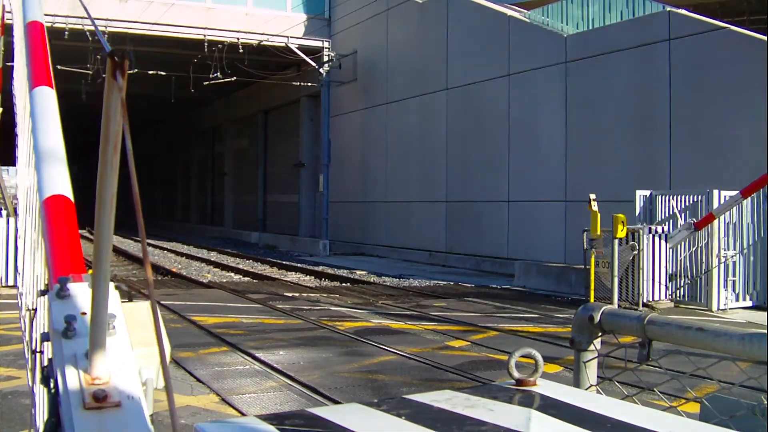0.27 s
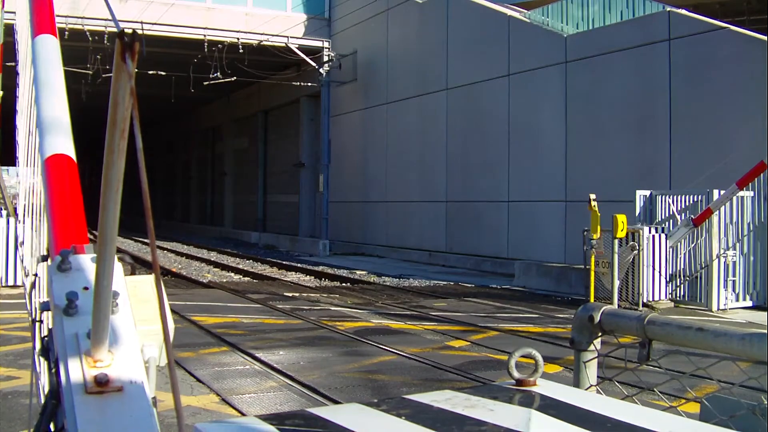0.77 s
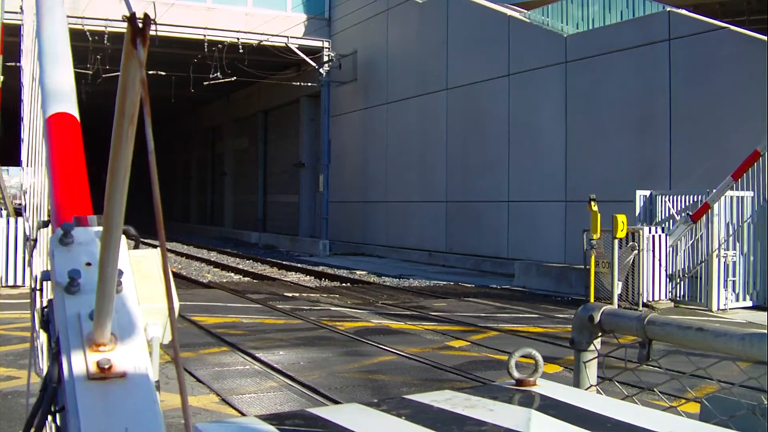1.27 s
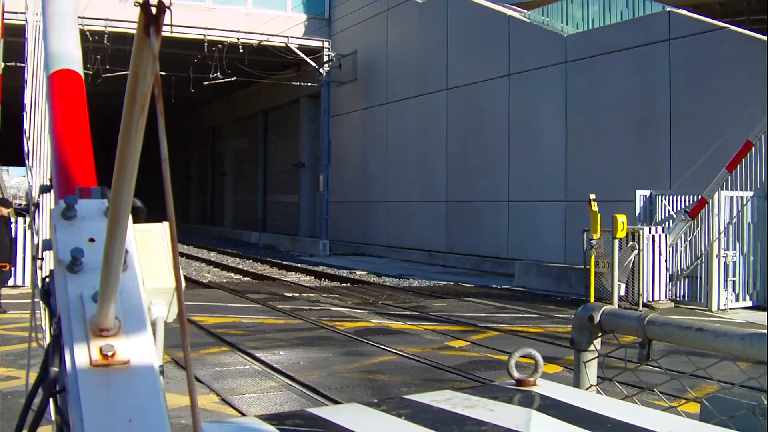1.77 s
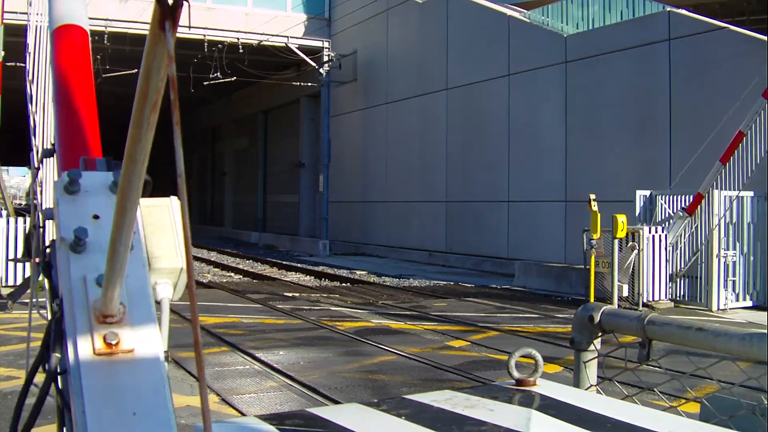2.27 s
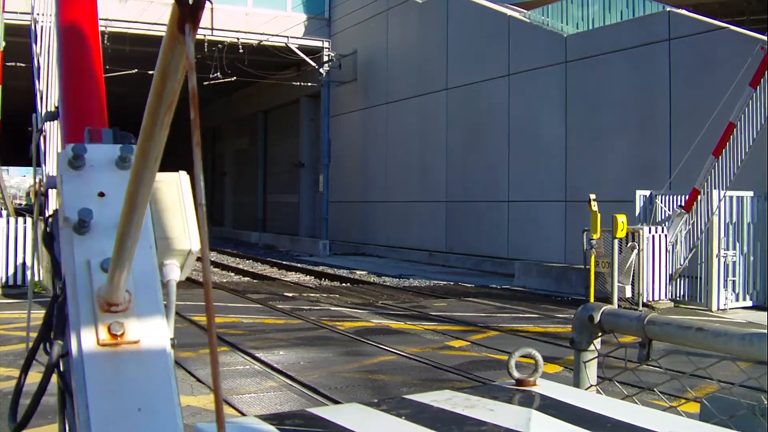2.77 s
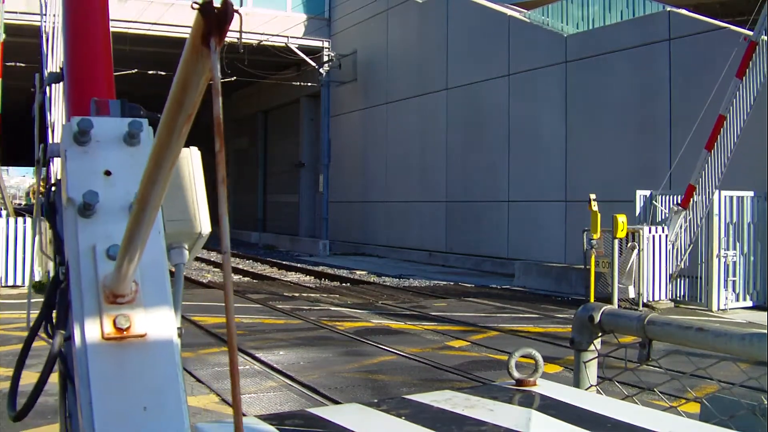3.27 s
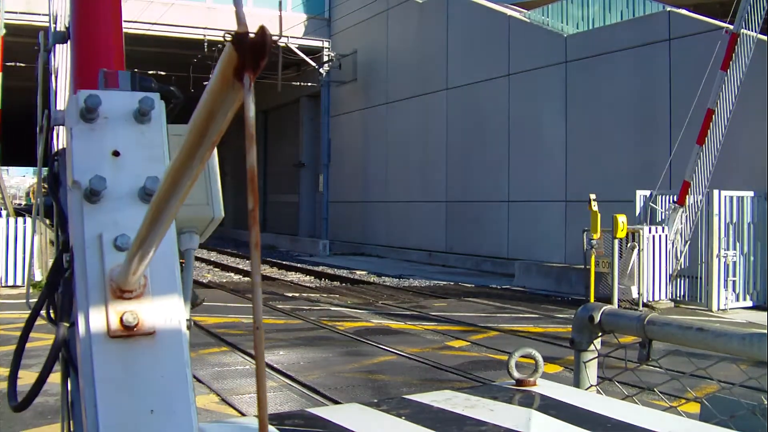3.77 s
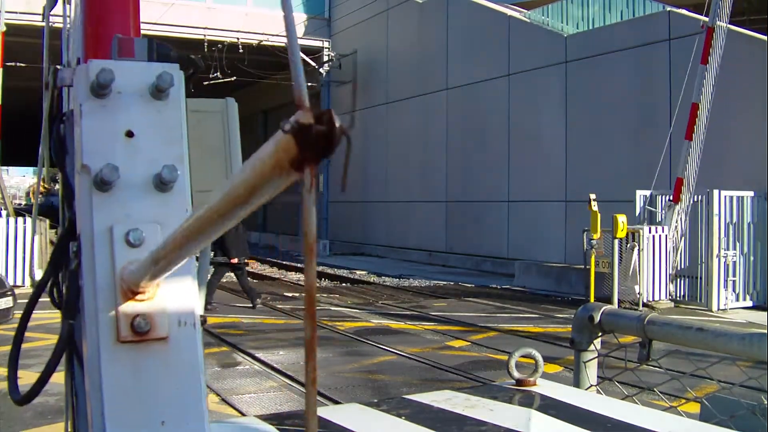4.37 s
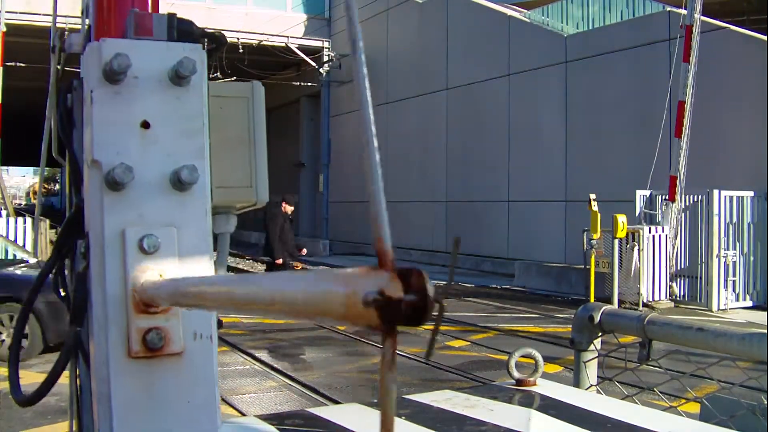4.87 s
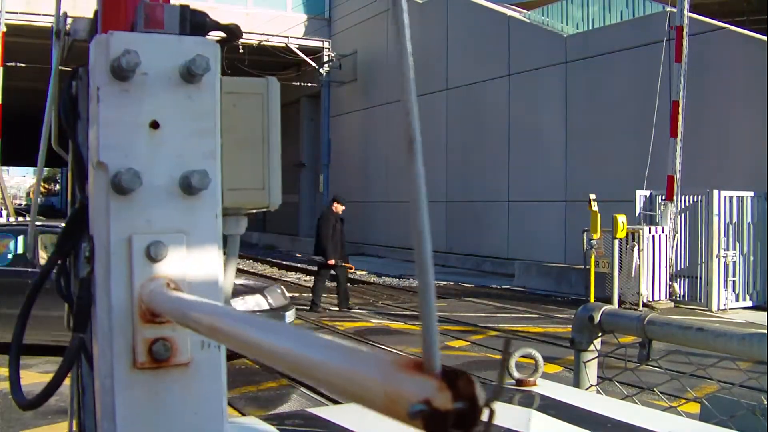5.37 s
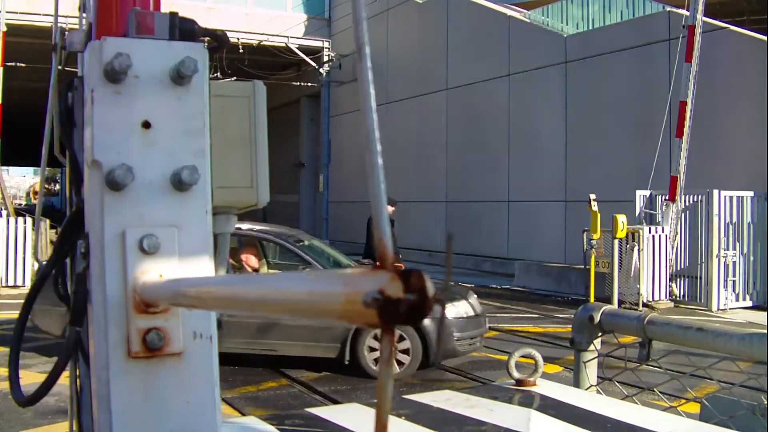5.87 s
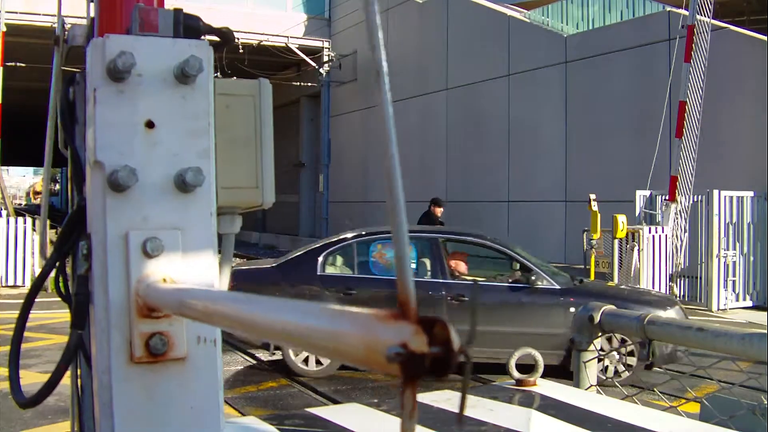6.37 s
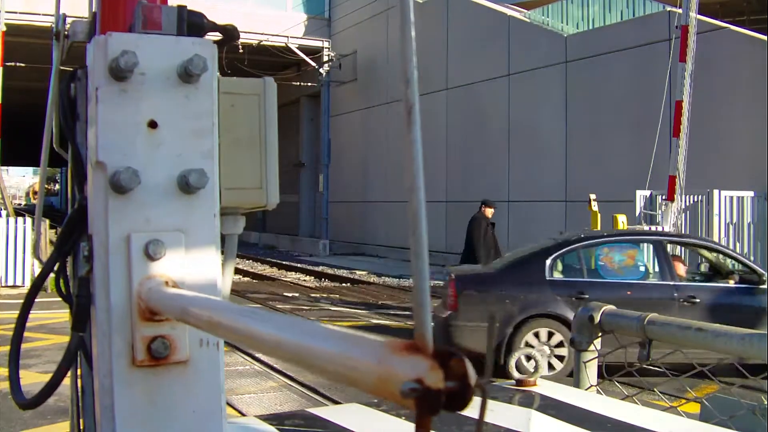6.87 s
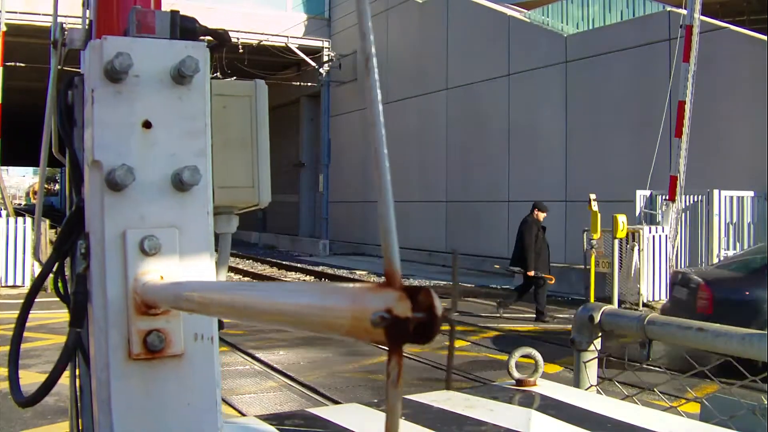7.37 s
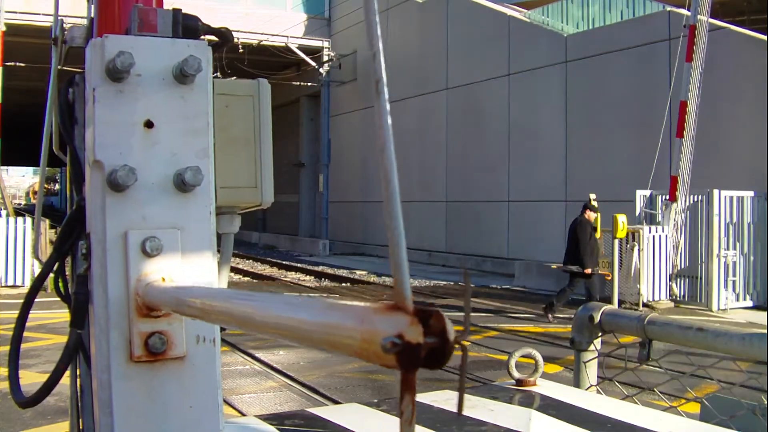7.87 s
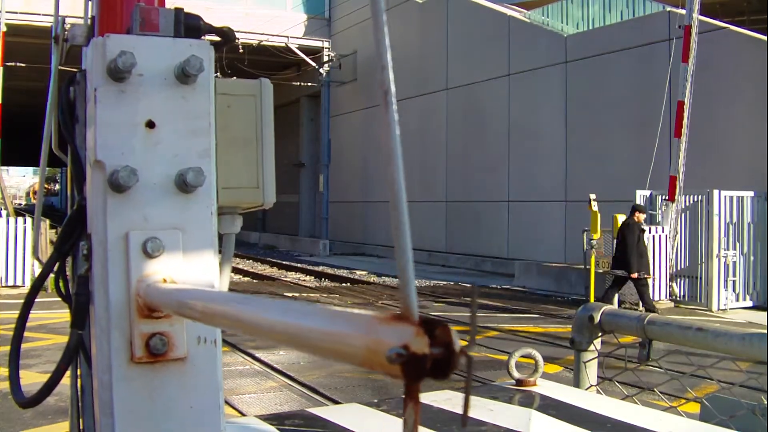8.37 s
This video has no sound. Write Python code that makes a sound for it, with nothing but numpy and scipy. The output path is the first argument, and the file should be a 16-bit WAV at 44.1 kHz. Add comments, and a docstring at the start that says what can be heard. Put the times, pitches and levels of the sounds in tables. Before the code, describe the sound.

A close electric motor hums and buzzes as a barrier lifts, metal linkage chatters briefly, it cuts out, then loud grit crunches and stones crack.

```python
"""A barrier motor hums and buzzes beside the listener, a train whine fades into a tunnel, then grit crunches.
Motor: shaft-locked sines, plus a brush track repeated each turn through housing resonances; cut near 5 s.
Linkage: impact bursts through metal modes, with decaying tones. Grit: random impacts, pebble ticks, scrapes
and cracks filtered by stone and ground. The train is one sinking sine; the car sums engine orders and a tyre
drone as it crosses the rails; knocked parts ring, soft bumps are shaped noise and the town is noise bands."""
import sys
import numpy as np
from scipy import signal
from scipy.fft import rfft, irfft
from scipy.io import wavfile
from scipy.ndimage import uniform_filter1d, map_coordinates

SR = 44100
rng = np.random.default_rng(int(sys.argv[2]) if len(sys.argv) > 2 else 0)


def transcribe(u):
    """Save the signal u as a 16-bit wav file named by the first command-line argument.

    u: samples, shape (n,) or (channels, n), limited to [-1, 1]; the rate is SR.
    q: integer samples, one column per channel.
    """
    v = np.clip(np.atleast_2d(u).T, -1, 1)
    q = np.round(v * 32767).astype(np.int16)
    wavfile.write(sys.argv[1], SR, q)


N = 380130
T = np.arange(N) / SR

# knocks of the metal linkage: (time [s], relative level [dB], mount relative to it [dB])
JINGLES = [(3.413, -19.5, -9), (3.429, -26.5, -2.5), (3.453, -31.5, 1), (3.492, -20.5, -14.5),
           (3.5072, -31, -7), (3.559, -29.5, -5.5), (3.63, -29.5, -7.5), (3.6594, -47, 3)]


def undb(db):
    """Decibels to gain."""
    return 10 ** (np.asarray(db) / 20)


def unit(x):
    """Scale to rms 1."""
    return x / np.sqrt(np.mean(x ** 2) + 1e-18)


def steady(x):
    """Hold the rms at 1 over a moving quarter second."""
    return x / np.sqrt(uniform_filter1d(x ** 2, size=SR // 4) + 1e-18)


def curves(table):
    """Columns of a (time [s], ...) table, joined by straight lines."""
    time_s, *columns = np.transpose(table)
    return [np.interp(T, time_s, column) for column in columns]


def add(out, start_s, x):
    """Mix x into out from start_s."""
    i = max(int(start_s * SR), 0)
    out[i:i + len(x)] += x[:max(N - i, 0)]


def band(x, hz, width_hz):
    """One resonance, gain 1 at its centre."""
    hz = min(hz, .45 * SR)
    return signal.lfilter(*signal.iirpeak(hz, hz / width_hz, fs=SR), x)


def ring(x, modes):
    """Parallel resonances, each cascaded twice for steep skirts."""
    out = 0
    for hz, width_hz, db in modes:
        stage_hz = 1.39 * width_hz  # the cascade narrows the band
        out = out + undb(db) * band(band(x, hz, stage_hz), hz, stage_hz)
    return out


def colour(x, points, size=2048):
    """Minimum-phase filter through (frequency [Hz], level [dB]) points."""
    hz, db = np.transpose(points)
    f = np.maximum(np.arange(size // 2 + 1) * SR / size, 1)
    cepstrum = irfft(np.log(undb(np.interp(np.log(f), np.log(hz), db))))
    # fold the cepstrum to make the filter causal
    cepstrum[1:size // 2] *= 2
    cepstrum[size // 2 + 1:] = 0
    impulse = irfft(np.exp(rfft(cepstrum)))
    return signal.oaconvolve(x, impulse)[:len(x)]


def shelve(x, treble_db):
    """Raise or lower the treble: harder contact is brighter."""
    dull = signal.sosfilt(signal.butter(1, 2600, fs=SR, output="sos"), x)
    return dull + undb(treble_db) * (x - dull)


def walk(rate_hz):
    """Smooth random wandering, spread 1."""
    k = int(SR / rate_hz)
    steps = np.repeat(rng.standard_normal(N // k + 1), k)
    return unit(uniform_filter1d(steps, k)[:N])


def grains(rate_hz, spread_db):
    """Random tiny impacts, a few much larger than the rest; rms 1."""
    size = undb(spread_db * np.minimum(rng.exponential(size=N), 4))
    hit = rng.random(N) < rate_hz / SR
    return unit(hit * size * rng.choice([-1, 1], N))


def swell(length_s):
    """A quick rise and a slower fall."""
    along = np.linspace(0, 1, max(int(length_s * SR), 8))
    return np.sin(np.pi * along ** 0.53) ** 2


def motor():
    """Poles hum on shaft multiples; brushes ring the housing; both die as the motor runs down."""
    # shaft rate before waver and run-down: (time [s], rate [turns/s])
    shaft_curve = [(0, 63.5), (.25, 63.49), (1.0, 63.93), (1.42, 63.5), (1.7, 63.88), (1.97, 63.98),
                   (2.3, 63.76), (2.85, 64.07), (3.25, 63.98), (3.72, 63.84), (4.18, 64.45), (4.6, 63.95),
                   (4.8, 65.4), (4.92, 65.9)]
    # load, easing near upright and back under braking: (time [s], hum level before partial levels [dB])
    hum_curve = [(0, -37.5), (.7, -38.5), (1.35, -38.5), (1.9, -42), (2.45, -39), (3.7, -49.5),
                 (4.2, -50.5), (4.62, -68), (4.77, -44), (5.05, -44)]
    # brush buzz: (time [s], level [dB])
    buzz_curve = [(0, -45), (.8, -42.5), (1.3, -43.5), (1.9, -45.5), (3.2, -44.5), (3.95, -43.5),
                  (4.4, -45), (4.95, -39)]
    # hum partials: (multiple of shaft rate, relative level [dB])
    hum_orders = [(2, -27.5), (3, -34), (4, -21), (5, 2.5), (15, -21), (21, -17.5), (25, -22), (34, -20.5),
                  (39, -19.5)]
    # motor housing: (frequency [Hz], width [Hz], relative level [dB])
    housing_modes = [(636, 180, 4.5), (1096, 540, 0.5), (1583, 170, -3), (2270, 220, -7.5),
                     (2540, 690, 0.5), (5640, 390, -1), (6726, 340, 1), (8100, 1100, -4.5),
                     (9340, 3500, -10.5)]
    # whining housing resonances: (frequency [Hz], width [Hz])
    whine_modes = [(5220, 850), (6410, 460)]
    # they take turns as the arm swings: (time [s], lower relative level [dB], upper relative level [dB])
    whine_curve = [(0, -47.5, -48), (.4, -46.5, -45), (.85, -47.5, -49), (1.35, -48, -45), (1.85, -48, -49),
                   (2.1, -50, -50), (2.35, -47, -50), (2.8, -47.5, -48.5), (3.3, -47.5, -47),
                   (3.95, -46.5, -45), (4.25, -47, -48), (4.95, -44, -41.5)]
    cut_s, coast_s, die_s = 4.945, .19, 0.13  # power cut; run-down time constant; time to silence
    hum_waver_db, hum_waver_hz, partial_waver_db = 1, 14, 1.1

    (shaft_hz,), (hum_db,), (buzz_db,) = curves(shaft_curve), curves(hum_curve), curves(buzz_curve)
    since_cut_s = np.maximum(T - cut_s, 0)
    turns = np.cumsum(shaft_hz * np.exp(-since_cut_s / coast_s) * (1 + 0.00047 * walk(9))) / SR
    running = np.clip(1 - (since_cut_s / die_s) ** 2, 0, 1)

    hum = 0
    for k, db in hum_orders:
        waver_db = (k != 5) * partial_waver_db * walk(2.8)  # the fifth stays even
        hum = hum + undb(db + waver_db) * np.sin(2 * np.pi * round(k) * turns)
    hum = undb(hum_db + hum_waver_db * walk(hum_waver_hz)) * hum

    scratch = brushes(turns)
    buzz = undb(buzz_db) * steady(sum(undb(0.5 * walk(2.84)) * ring(scratch, [mode])
                                      for mode in housing_modes))
    whine = 0
    for (hz, width_hz), db in zip(whine_modes, curves(whine_curve)):
        whine = whine + undb(db) * steady(ring(scratch, [(hz, width_hz, 0)]))
    return running * (hum + buzz + undb(-0.5) * whine + singing(turns))


def brushes(turns, count=5, size=690):
    """Brushes scratch the same track each turn; the track slowly changes at even loudness."""
    place = turns % 1 * size
    tracks = rng.standard_normal((count, size))
    drift_hz = 3.196
    shares = np.array([walk(drift_hz) for _ in tracks])
    shares = shares / np.linalg.norm(shares, axis=0)
    scratch = 0
    for share, track in zip(shares, tracks):
        scratch = scratch + share * map_coordinates(track, [place], order=3, mode="grid-wrap")
    return scratch + undb(-8.5) * rng.standard_normal(N)  # plus noise that does not repeat


def singing(turns):
    """The housing sings thin shaft-locked tones that swell and fade as the arm swings."""
    # (start [s], length [s], multiple of shaft rate, level [dB])
    sung_tones = [(-.4, 1.2, 101, -51), (0, .7, 42, -55), (.05, .45, 100, -55), (.3, 1.64, 91, -50.5),
                  (.8, .35, 83, -54), (.9, 1.44, 101, -51), (1.15, 0.49, 100, -51), (1.15, 0.76, 46, -55),
                  (1.35, 1.5, 44, -54), (1.6, 1.3, 34, -55), (1.846, .4, 106, -53), (1.95, .85, 79, -49),
                  (1.948, 0.67, 111, -54), (2.05, .6, 84, -52), (2.65, 1.15, 90, -54),
                  (2.7, 0.87, 101, -56), (3.15, 0.89, 40, -52.5), (3.75, .3, 84, -50), (3.78, .27, 77, -51),
                  (3.85, 0.74, 99, -51), (3.95, 0.58, 89, -51)]
    waver_db, waver_hz = 2, 7.06
    out = 0
    for start_s, length_s, k, db in sung_tones:
        along = np.clip(2 * (T - start_s) / length_s - 1, -1, 1)
        gain = undb(db + waver_db * walk(waver_hz)) * (1 - along ** 4)
        out = out + gain * np.sin(2 * np.pi * round(k) * turns)
    return out


def linkage():
    """Loose metal parts clack and chatter, ring high and shake their mount."""
    # high modes: (frequency [Hz], width [Hz], relative level [dB])
    link_modes = [(6600, 250, -9), (8900, 390, 4.5), (10200, 360, 2.5), (10400, 480, 0), (11000, 500, -7),
                  (12550, 230, -1), (13300, 600, -8), (13900, 350, -18)]
    # duller clatter of the mount: (frequency [Hz], width [Hz], relative level [dB])
    mount_modes = [(1230, 1100, 7.5), (2380, 1440, 6.5), (3300, 1400, -4), (4640, 3600, 6), (6000, 1000, 1)]
    chatter_t60_s, clack_s, clack_db = 0.15, 0.0028, -9  # clack: time constant and relative level
    push, shake = np.zeros(N), np.zeros(N)
    t = T[:SR // 3]
    chatter_shape = undb(-60 * t / chatter_t60_s) * (1 - np.exp(-t / 0.0024))
    shape = chatter_shape + undb(clack_db) * np.exp(-t / clack_s)
    for start_s, db, mount_db in JINGLES:
        add(push, start_s, undb(db) * shape)
        add(shake, start_s, undb(db + mount_db) * shape)
    chatter = grains(3500, 1.5)
    return undb(-1) * ring(push * chatter, link_modes) + ring(shake * chatter, mount_modes)


def chimes():
    """Each knock leaves the linkage ringing, with a different balance of its tones."""
    # clear linkage tones: (frequency [Hz], relative level [dB], t60 [s])
    link_tones = [(6720, -5, .25), (7400, -11, 0.2), (8900, -3, 0.18), (9770, -2, 0.16), (10140, -2, 0.12),
                  (11400, -6, .12), (12450, -11, 0.22), (12960, -10, .15)]
    tones_db, scatter_db = -16, 4  # relative to the knock; spread from knock to knock
    out = np.zeros(N)
    t = T[:SR // 3]
    chances = rng.standard_normal((len(JINGLES), len(link_tones)))
    for (start_s, knock_db, _), chance in zip(JINGLES, chances):
        for (hz, tone_db, t60_s), c in zip(link_tones, chance):
            db = knock_db + tones_db + tone_db + scatter_db * c
            add(out, start_s, undb(db - 60 * t / t60_s) * np.sin(2 * np.pi * hz * t))
    return out


def grit():
    """Small stones grind in fits, brighter under weight, with pebble crackle and harder scrapes."""
    # weight on the sliding grit: (time [s], relative level [dB])
    weight_curve = [(4.97, -40), (5.085, -32), (5.2, -26.5), (5.42, -23.5), (5.5, -30), (5.67, -27),
                    (5.8, -24.5), (6.0, -24.5), (6.15, -26), (6.3, -28), (6.6, -25), (6.8, -27.5),
                    (7.08, -35.5), (7.22, -33), (7.45, -30), (7.9, -36.5), (8.25, -36), (8.42, -41.5)]
    # scrapes: (start [s], length [s], relative level [dB], hollow ring relative to it [dB])
    scrape_events = [(0.145, 0.097, -32.5, -6), (0.532, 0.047, -39, -23), (0.69, 0.14, -36, -5),
                     (0.857, 0.24, -42, 2.5), (1.005, 0.071, -40, -14), (2.39, 0.13, -42.5, -23),
                     (4.032, 0.079, -39, -17), (4.39, 0.36, -64, 18), (5.098, 0.12, -38.5, 1),
                     (5.262, 0.13, -25.5, -27), (5.35, 0.11, -20.5, -8), (5.615, 0.063, -28, -12),
                     (5.764, 0.072, -22.5, -5.5), (5.983, 0.068, -25, -18), (6.153, 0.064, -25.5, -20),
                     (6.232, 0.037, -29, -11), (6.274, .035, -28, -12), (6.375, 0.069, -25, -21),
                     (6.447, 0.13, -22, -15), (6.543, 0.11, -17, -39), (6.736, 0.055, -25.5, -14),
                     (6.847, 0.071, -26.5, -32), (7.265, 0.2, -28.5, -34), (7.417, 0.13, -30, -26),
                     (7.502, 0.066, -28.5, -6), (7.702, 0.11, -34, -13), (7.822, 0.046, -33.5, -12),
                     (7.99, 0.074, -33, -24), (8.138, 0.082, -37, -17), (8.292, 0.03, -32, -24),
                     (8.55, 0.095, -35.5, -35.5)]
    fit_db, fit_hz = 0.59, 36
    firm_treble_db, treble_per_db, firm_db = 1.5, 0.64, -25.5  # treble at the firm level; slope; that level
    grip_s, dull_db_per_s = 6.02, -12.5  # duller until the stones bite, over the last second before
    pebbles_db = -6.5

    level_db = curves(weight_curve)[0] + fit_db * walk(fit_hz)
    treble_db = firm_treble_db + treble_per_db * (level_db - firm_db)
    treble_db = treble_db + dull_db_per_s * np.clip(grip_s - T, 0, 1)
    press = undb(level_db + 1.55 * walk(70)) * (T > weight_curve[0][0])

    scrape, hollow = np.zeros(N), np.zeros(N)
    for start_s, length_s, db, ring_db in scrape_events:
        add(scrape, start_s, undb(db) * swell(length_s))
        add(hollow, start_s, undb(db + ring_db) * swell(length_s))

    sliding = on_ground(press * grains(4000, 2.2), 1.6 * undb(2.0 * walk(31)))
    stones = grains(5000, 1.9)
    hollow_ring = unit(ring(stones, [(1145, 150, 8.0), (790, 460, -21), (2000, 1600, -1)]))
    scraping = on_ground(scrape * stones, 0.47) + hollow * hollow_ring
    crackle = undb(pebbles_db) * press * pebbles()
    return shelve(undb(-1.35) * sliding + crackle, treble_db) + shelve(scraping, -2.8)


def on_ground(impacts, body):
    """Stone impacts sound bright and dry; body is the share that rings the ground."""
    # stone impact spectrum: (frequency [Hz], relative level [dB])
    grit_colour = [(90, -34), (220, -25), (350, -22.5), (520, -12.5), (700, 0.5), (1000, -3.5), (1270, 0),
                   (1850, -8.5), (2350, -6.5), (4870, -8.5), (5980, -9.5), (10100, -12), (14100, -23),
                   (15500, -32)]
    # gritty ground: (frequency [Hz], width [Hz], relative level [dB])
    ground_modes = [(945, 380, -5), (1330, 190, -6), (2300, 74, -1)]

    def respond(x, share):
        return colour(x, grit_colour) + undb(-13.5) * ring(x * share, ground_modes)

    click = signal.unit_impulse(4096)
    return respond(impacts, body) / np.linalg.norm(respond(click, 0.68))


def pebbles(count=6000):
    """Coarse crackle: every pebble ticks at its own pitch and size; rms 1."""
    rate_hz, spread_db = 340, 2
    low_hz, high_hz, decay_cycles = 631, 6400, 6.2  # cycles until a tick falls to 1/e
    bass_cut_hz = 470  # small stones radiate no bass
    out = np.zeros(N)
    t = T[:SR // 40]
    start_s = 0
    for gap, pitch, size in rng.random((count, 3)):
        start_s += -np.log(1 - gap) / rate_hz
        hz = low_hz * (high_hz / low_hz) ** pitch
        gain = undb(spread_db * min(-np.log(1 - size), 3))
        add(out, start_s, gain * np.exp(-hz * t / decay_cycles) * np.sin(2 * np.pi * hz * t))
    return unit(signal.sosfilt(signal.butter(3, bass_cut_hz, "high", fs=SR, output="sos"), out))


def cracks():
    """A stone slips with a dry snap that briefly rings its modes, then a short shower of chips."""
    # (time [s], relative level [dB], low body relative to it [dB], shower t60 [s])
    crack_events = [(0.685, -11, 20, 0.099), (0.694, -24, 8, .05), (0.747, -20, 9, .03),
                    (4.823, -22.5, 22.5, 0.11), (4.991, -17.5, -5, 0.045), (5.0366, -8.5, -4, 0.076),
                    (5.1033, -26, 32, 0.074), (5.1362, -14.5, 7, 0.097), (5.155, -14, 32.5, 0.03),
                    (5.236, -5, -11, 0.021), (5.4193, -7.5, -7, 0.09), (5.565, -13.5, -13, 0.13),
                    (5.6977, -5.5, -9, 0.093), (5.8366, -8, -5, 0.042), (5.9085, -4.5, 13, 0.09),
                    (6.4997, -7.5, 10, 0.12), (6.733, -9.5, 16, 0.14), (6.96, -10.5, -13, 0.12),
                    (7.003, -21, 9, 0.19), (7.054, -24, -5, 0.064), (7.317, -10.5, 13, 0.19),
                    (7.3315, -13, 31, 0.063), (7.5265, -6.5, -13, 0.089), (7.686, -18.5, 5, 0.1),
                    (7.982, -26, 5, .03), (8.0658, -13.5, 16, 0.18), (8.074, -19, 21, 0.073)]
    snap_db = 5  # first sharp contact, relative to the event
    stone_db, stone_t60_s = -20.5, 0.044  # each stone mode, relative to the event
    burst, burst_s = 0.18, 0.0016  # extra chips at the break: share; time constant
    snaps, body = np.zeros(N), np.zeros(N)
    chips = grains(12000, 1.2)
    t = T[:SR // 4]
    for (start_s, db, body_db, t60_s), pitches in zip(crack_events, rng.random((len(crack_events), 8))):
        i = int(start_s * SR)
        decay = undb(-60 * t / max(t60_s, .01))
        shower = chips[i:i + len(t)] * decay * (1 + burst * np.exp(-t / burst_s))
        modes_hz = 1800 + 1250 * (np.arange(len(pitches)) + pitches)
        stone = np.sin(2 * np.pi * np.outer(t, modes_hz)).sum(axis=1) * undb(-60 * t / stone_t60_s)
        add(snaps, start_s, undb(db) * (undb(-8.0) * shower + undb(stone_db) * stone))
        add(snaps, start_s, undb(db + snap_db) * np.array([1, -1]))  # a hard contact has little bass
        add(body, start_s, undb(db + body_db) * shower)
    bright = undb(-4) * shelve(on_ground(snaps, 0), 4.6)
    return bright + undb(-23.5) * ring(body, [(1320, 1020, -0.88), (1026, 35, -1.1)])


def rings():
    """A knocked hollow part rings on at one pitch, unsteady as the part rattles."""
    # (time [s], frequency [Hz], level [dB], t60 [s])
    ring_events = [(0.548, 789, -32, 0.22), (0.688, 1120, -21.5, 0.24), (0.746, 1156, -29, 0.11),
                   (3.413, 3310, -32, .25), (5.037, 5100, -19.5, .07), (5.698, 3410, -14.5, 0.075),
                   (7.512, 998, -25, .12)]
    attack_s, pitch_spread = 0.0025, 0.024  # rise time constant; fractional pitch spread
    out = np.zeros(N)
    t = T[:SR // 3]
    rattle = 1 + pitch_spread * walk(150)
    for start_s, hz, db, t60_s in ring_events:
        phase = 2 * np.pi * np.cumsum(hz * rattle[int(start_s * SR):][:len(t)]) / SR
        shape = undb(db - 60 * t / t60_s) * (1 - np.exp(-t / attack_s))
        add(out, start_s, shape * np.sin(phase))
    return out


def bumps():
    """Soft low knocks and buffets: narrow noise under a swell."""
    # (start [s], length [s], centre [Hz], level [dB])
    bump_events = [(0.025, 0.077, 131, -48), (0.742, 0.02, 240, -28), (1.395, 0.25, 100, -55),
                   (1.785, 0.27, 111, -51.5), (2.576, 0.24, 91, -57), (3.906, 0.12, 60, -56),
                   (4.507, 0.079, 70, -56), (4.977, 0.092, 225, -40.5), (6.734, .07, 610, -31),
                   (7.316, 0.057, 480, -36), (8.059, 0.069, 420, -40.5), (7.17, .1, 80, -58),
                   (8.386, 0.11, 70, -59)]
    out = np.zeros(N)
    for start_s, length_s, hz, db in bump_events:
        shape = swell(length_s)
        rumble = ring(rng.standard_normal(SR), [(hz, 0.56 * hz, 0)])[-len(shape):]
        add(out, start_s, undb(db) * shape * unit(rumble))
    return out


def car():
    """A quiet engine picks up, eases over the rails and pulls away; tyres drone on the crossing."""
    # engine: (time [s], firing rate [Hz], level before order levels [dB])
    engine_curve = [(3.6, 34.1, -69), (4.15, 36.3, -63), (4.7, 40.8, -58), (5.3, 47.7, -43),
                    (5.6, 51.9, -50), (5.85, 54.1, -52), (6.15, 49, -50.5), (6.9, 39.7, -69),
                    (7.4, 37, -61), (8.0, 41.5, -57.5), (8.62, 48.4, -56)]
    # (multiple of firing rate, relative level [dB])
    engine_orders = [(1, -16), (2, -24), (3, -5.5), (4, -10.5), (5, -10.5), (6, -15)]
    on_s, off_s, ramp_s = 5.35, 6.65, 0.19  # tyres on the crossing; rise and fall
    before_db, crossing_db, road_db = -75, -51.5, -90

    hz, db = curves(engine_curve)
    phase = 2 * np.pi * np.cumsum(hz * (1 + 0.0079 * walk(26))) / SR
    engine = undb(db) * sum(undb(order_db + 2.9 * walk(18)) * np.sin(round(k) * phase)
                            for k, order_db in engine_orders)
    drone = unit(ring(rng.standard_normal(N), [(272, 23, 0)]))
    tyre_db = np.interp(T, [on_s - ramp_s, on_s, off_s, off_s + ramp_s],
                        [before_db, crossing_db, crossing_db, road_db])
    return engine + undb(tyre_db) * drone


def train():
    """The traction whine sinks and wavers as the tunnel swallows it."""
    start_hz, sag_per_s = 300, .14  # exponential fall
    start_db, fade_db_per_s2 = -51.5, 1.5  # fades ever faster
    hz = start_hz * np.exp(-sag_per_s * T)
    db = start_db - fade_db_per_s2 * T ** 2
    gain = np.sqrt(2) * undb(db + walk(30.4))  # sine of rms db
    return gain * np.sin(2 * np.pi * np.cumsum(hz * (1 + 0.014 * walk(26.2))) / SR)


def town():
    """Distant traffic: half-octave noise bands that waver a little, the bass most of all."""
    # (frequency [Hz], relative density [dB per Hz])
    town_colour = [(25, -28), (50, -11.5), (100, -11), (160, -5.5), (270, 3.5), (400, 3), (500, -2),
                   (650, 5.5), (1150, 5), (1800, -13), (3000, -1), (4200, -31), (7500, -6), (15000, -49)]
    # town and road noise: (time [s], level [dB])
    town_curve = [(0, -41), (1, -42), (2, -43.5), (4, -42.5), (4.8, -40), (6, -41), (7, -40), (8.62, -40)]
    colour_hz, colour_db = np.transpose(town_colour)
    out = 0
    for hz in 35 * 2 ** (np.arange(18) / 2):
        db = np.interp(np.log(hz), np.log(colour_hz), colour_db)
        unrest_db = np.interp(hz, [100, 350], [3, 1.1])
        noise = ring(rng.standard_normal(N), [(hz, hz / 2.43, 0)])
        out = out + undb(db + unrest_db * walk(10)) * noise
    return unit(out) * undb(curves(town_curve)[0])


def scene():
    """Everything at the crossing, in one channel."""
    mechanism = motor() + linkage() + chimes()
    ground = grit() + cracks() + rings() + bumps()
    return (mechanism + ground + train() + car() + town())[None]


def record(dry):
    """A narrow notch in the treble, then a steep cut of the top."""
    notch_hz, top_hz = 7900, 15600
    notched = signal.lfilter(*signal.iirnotch(notch_hz, 45, fs=SR), dry)
    return signal.sosfilt(signal.ellip(10, .2, 80, top_hz, fs=SR, output="sos"), notched)


dry = scene()
out = record(dry)
transcribe(out)
```